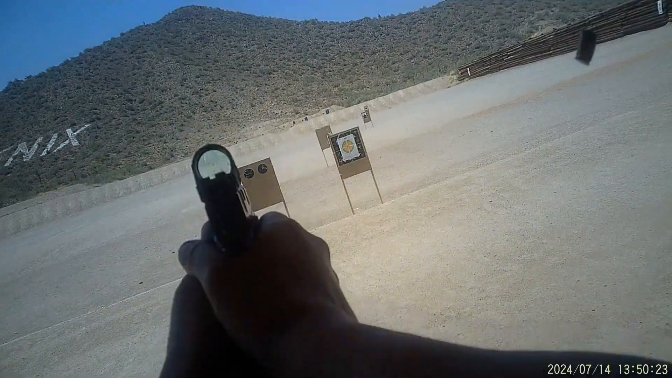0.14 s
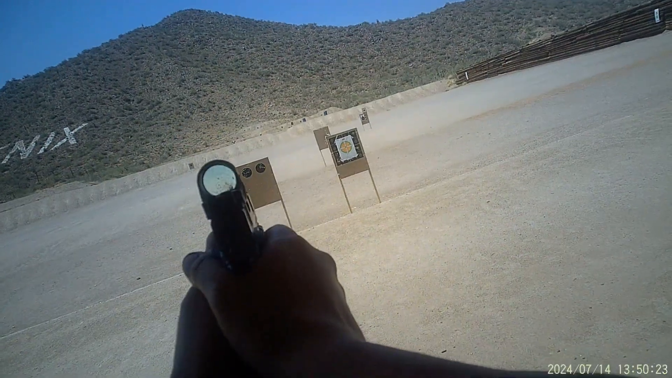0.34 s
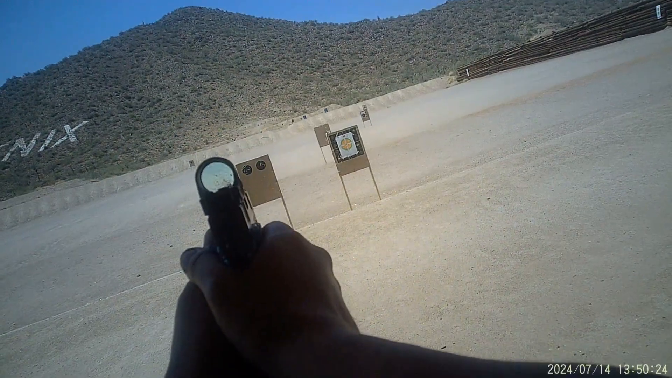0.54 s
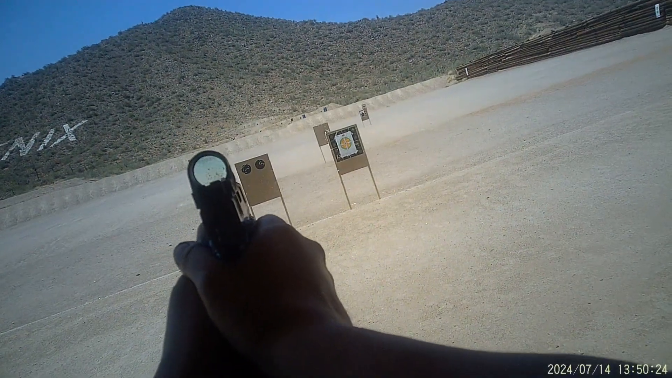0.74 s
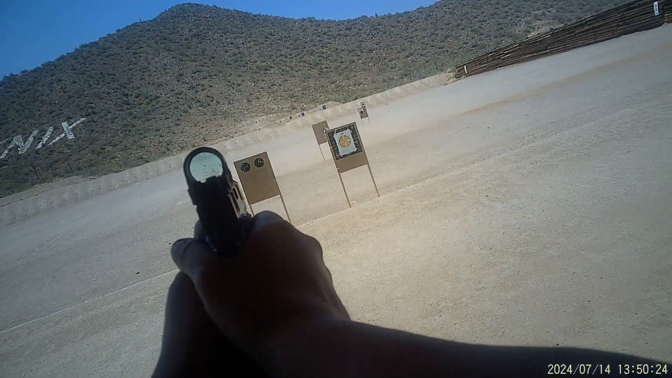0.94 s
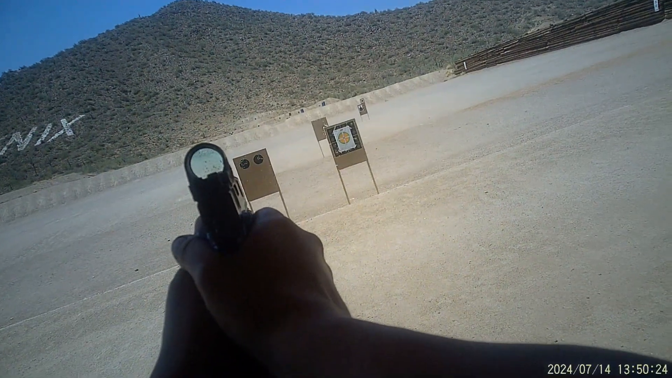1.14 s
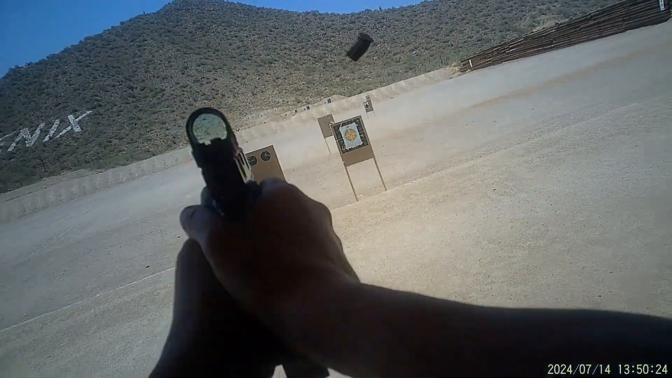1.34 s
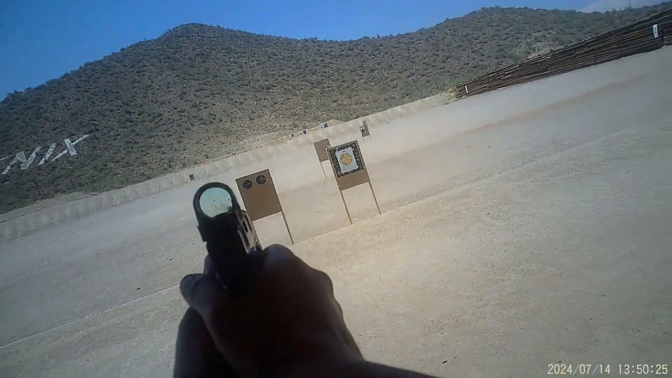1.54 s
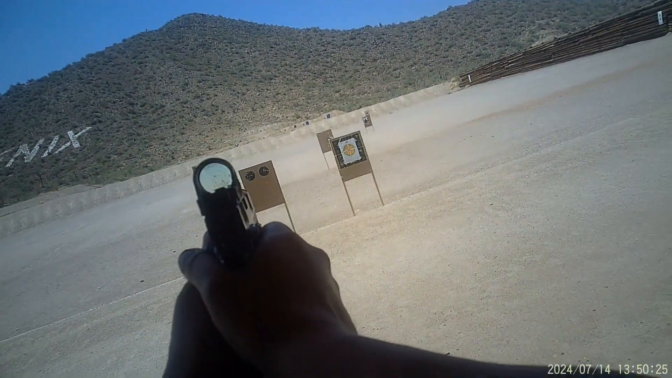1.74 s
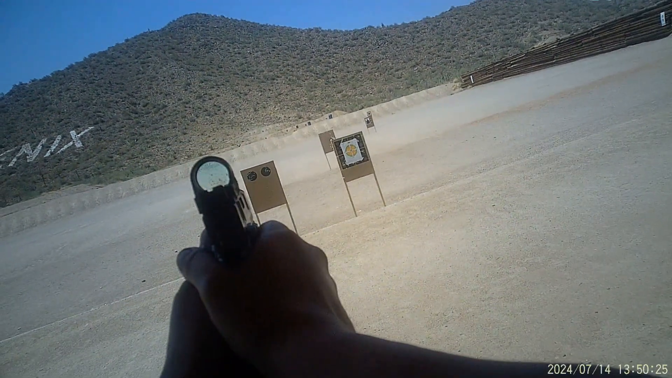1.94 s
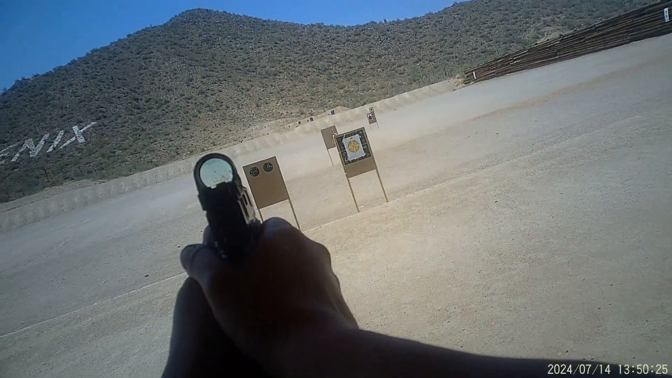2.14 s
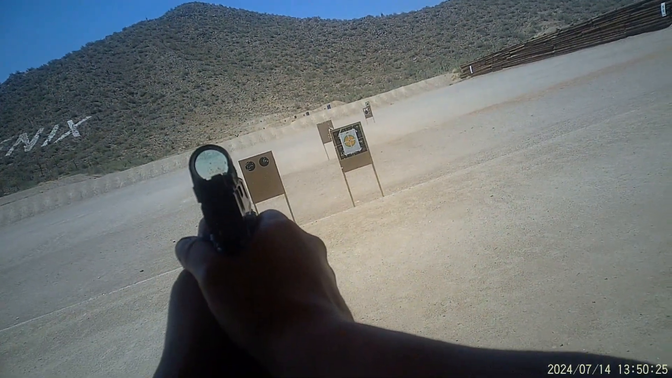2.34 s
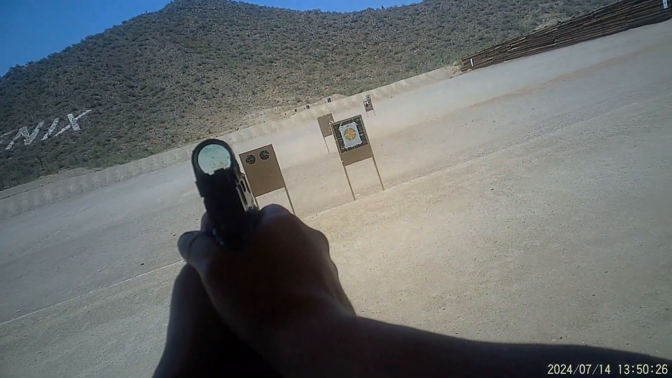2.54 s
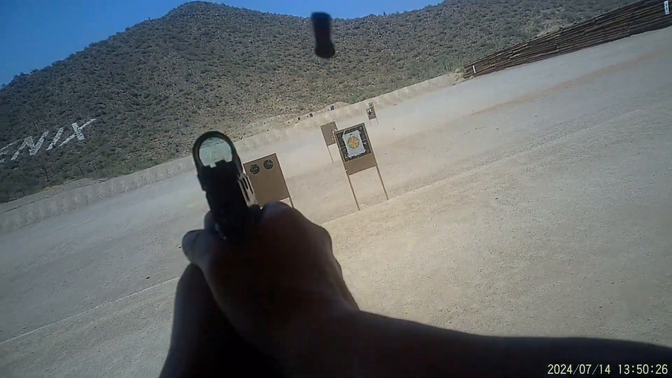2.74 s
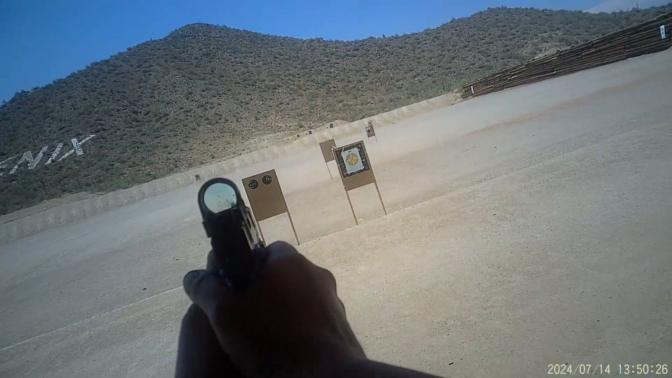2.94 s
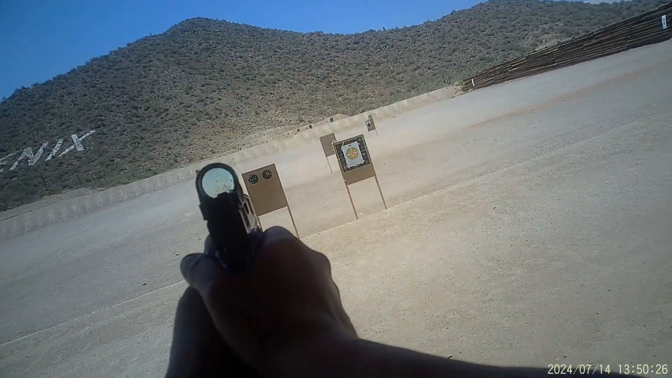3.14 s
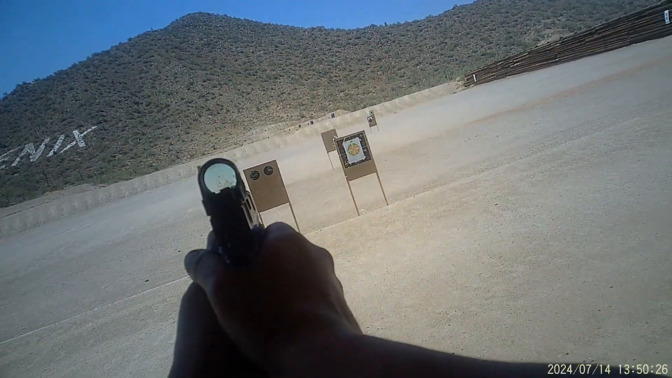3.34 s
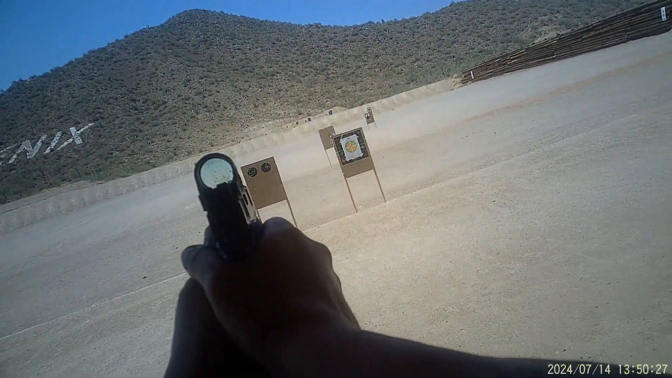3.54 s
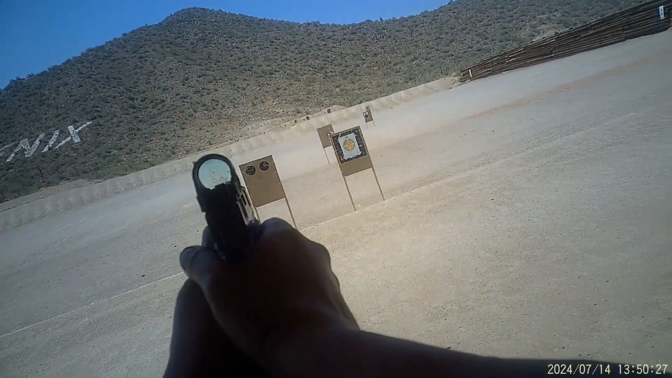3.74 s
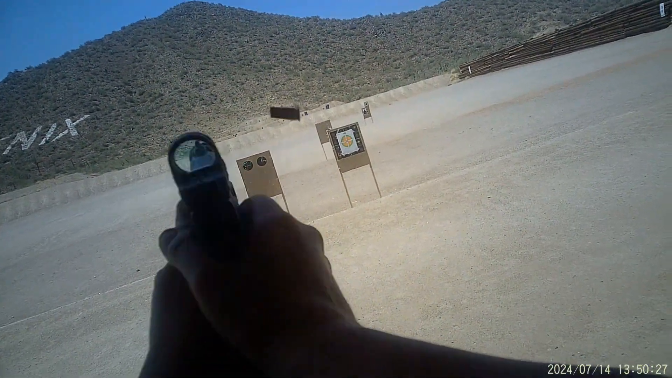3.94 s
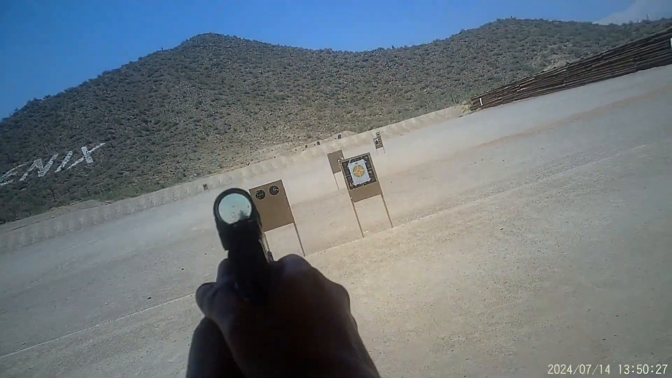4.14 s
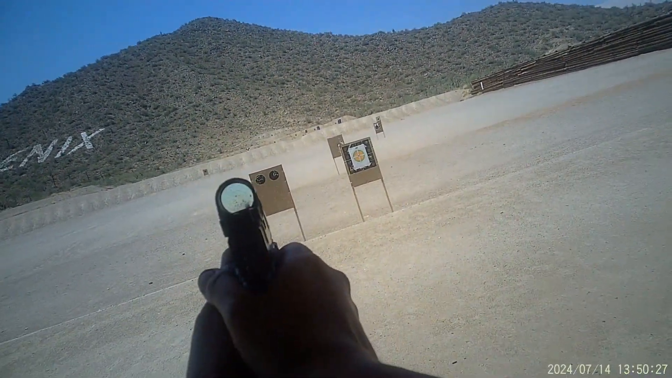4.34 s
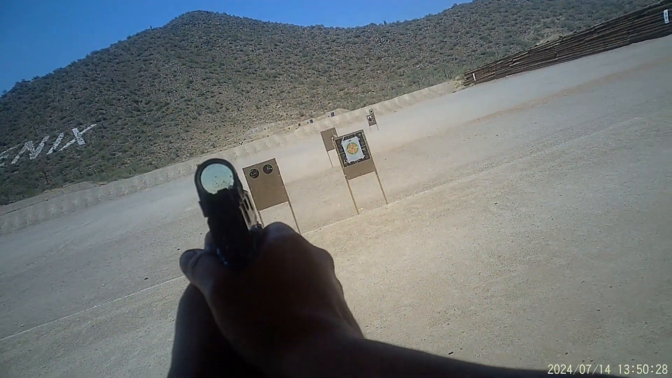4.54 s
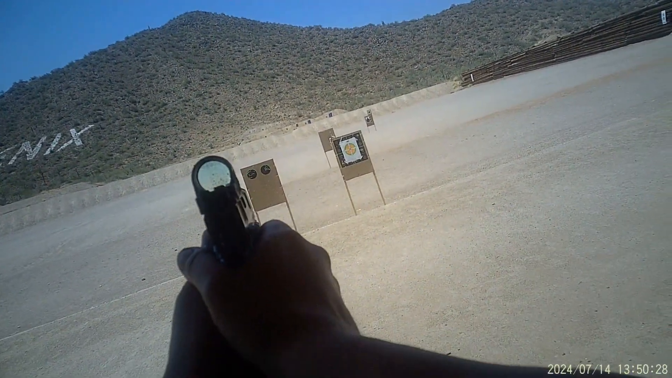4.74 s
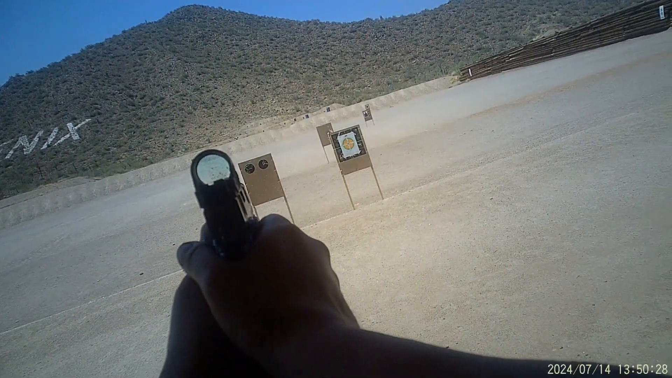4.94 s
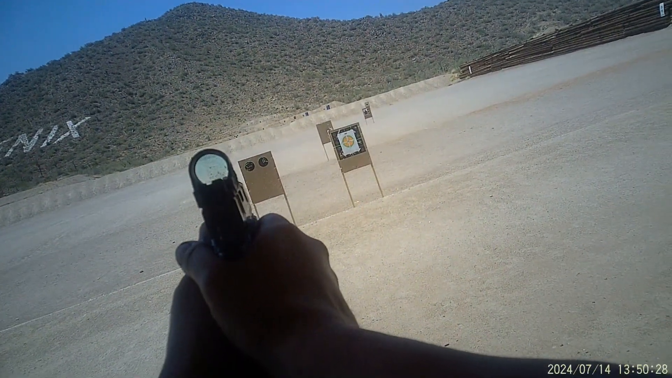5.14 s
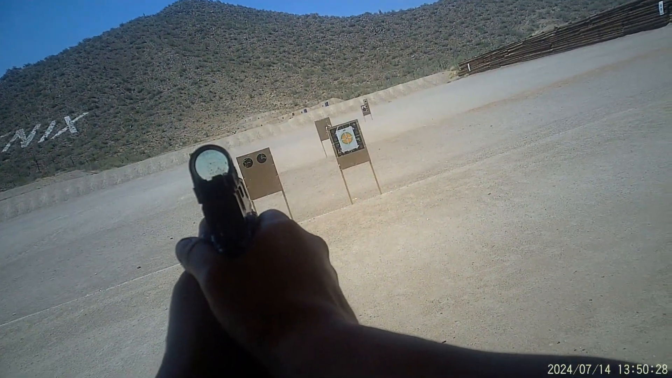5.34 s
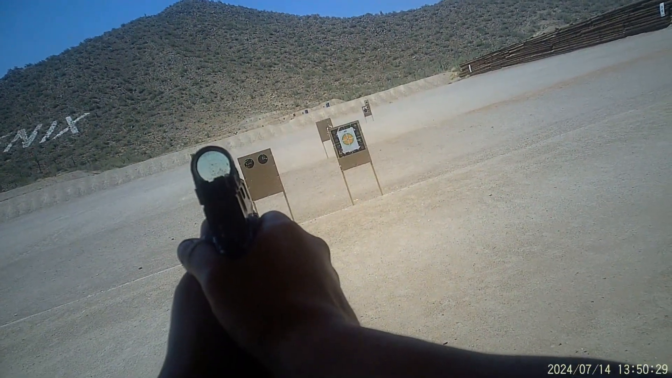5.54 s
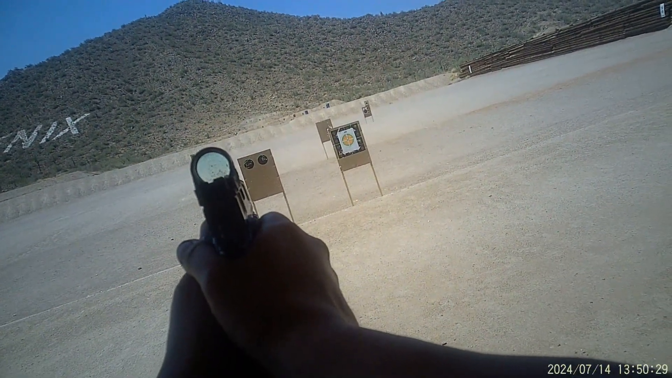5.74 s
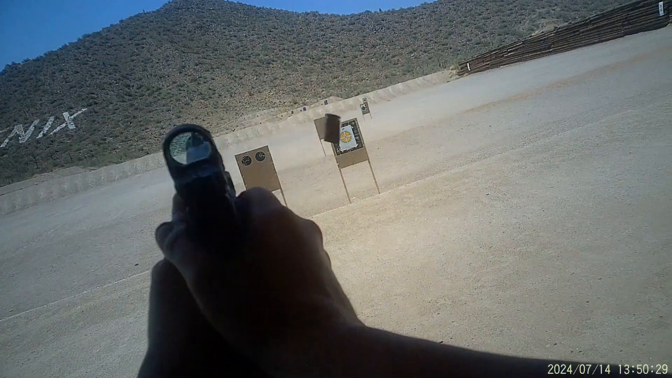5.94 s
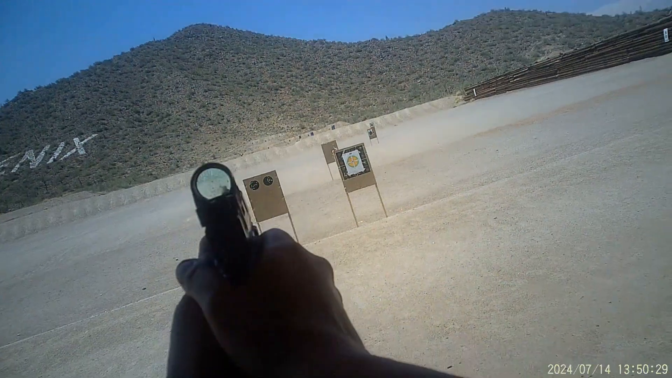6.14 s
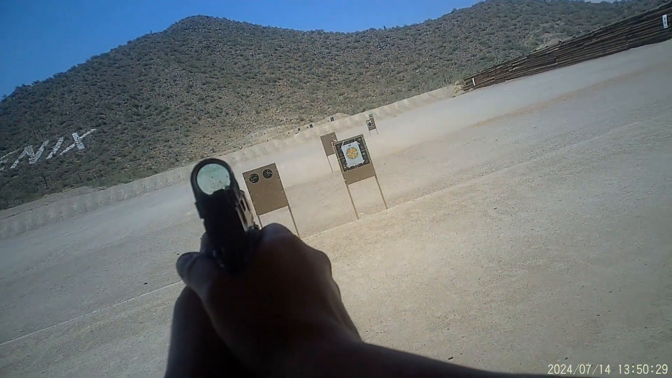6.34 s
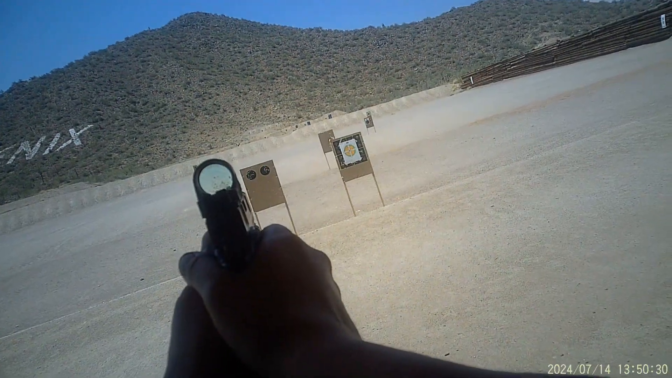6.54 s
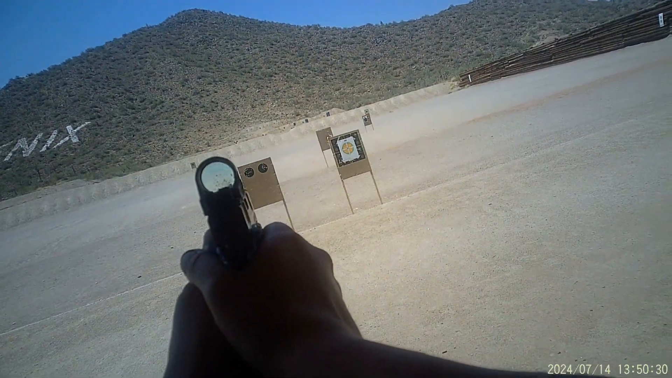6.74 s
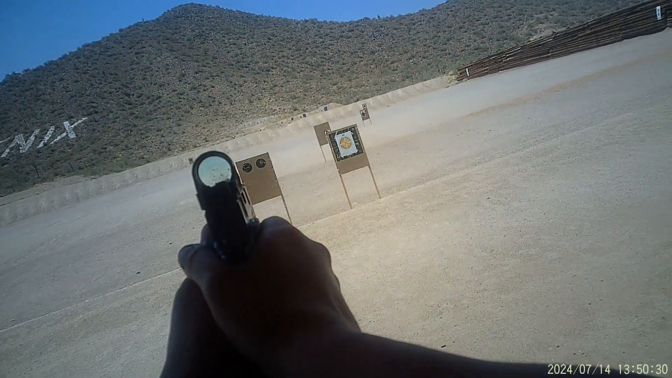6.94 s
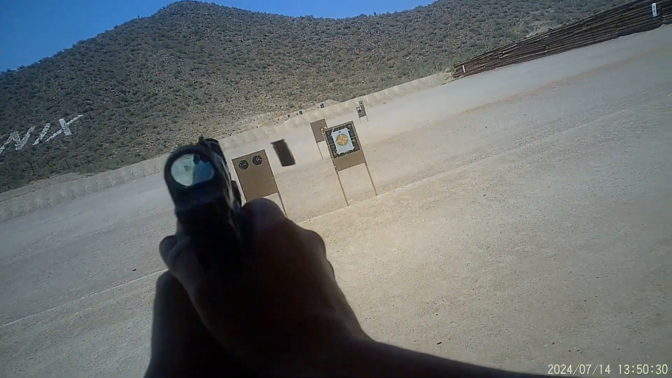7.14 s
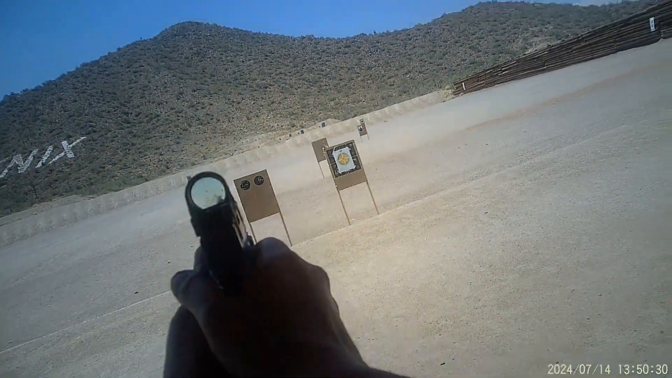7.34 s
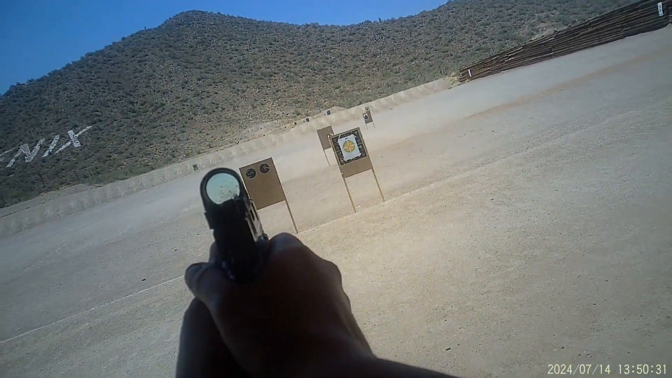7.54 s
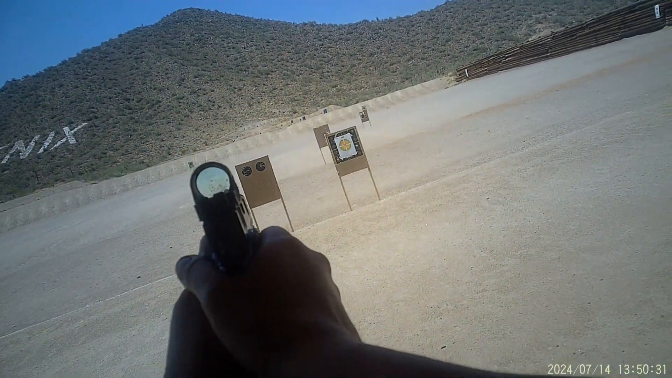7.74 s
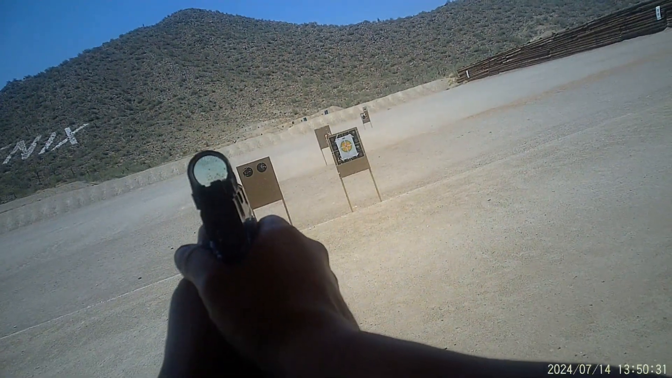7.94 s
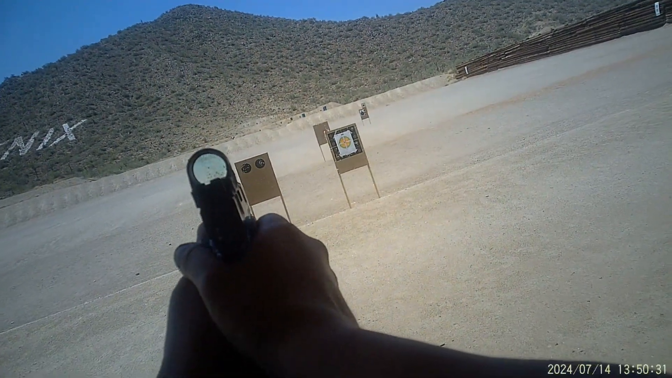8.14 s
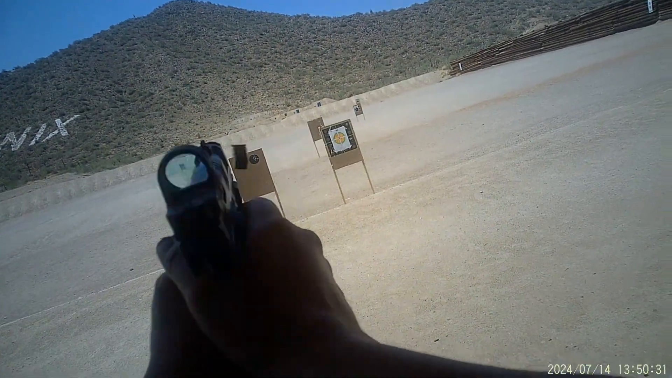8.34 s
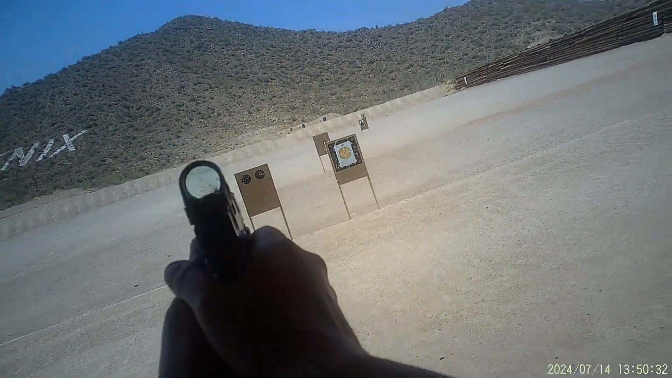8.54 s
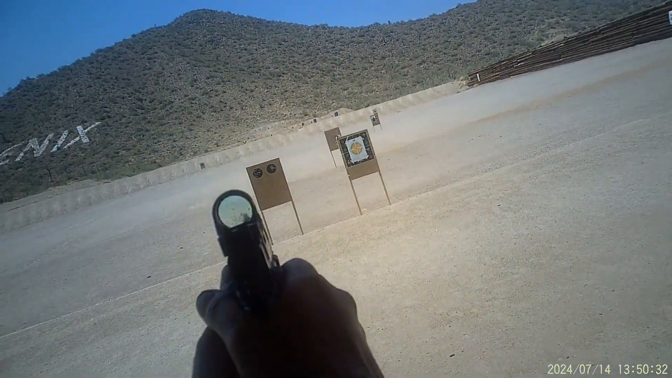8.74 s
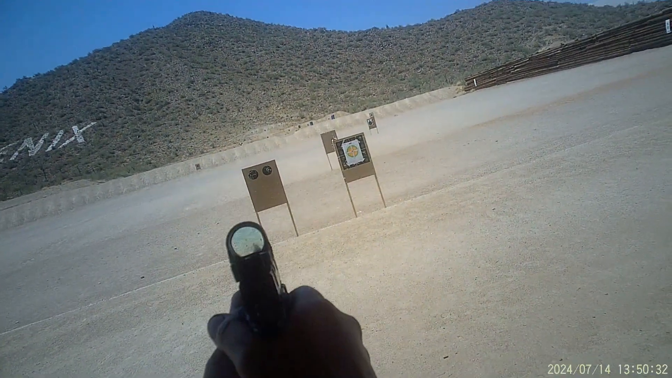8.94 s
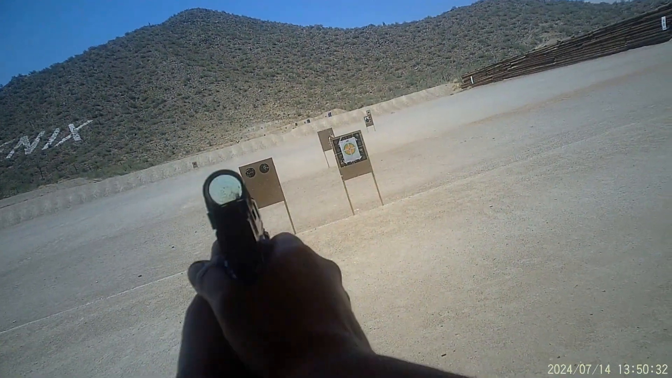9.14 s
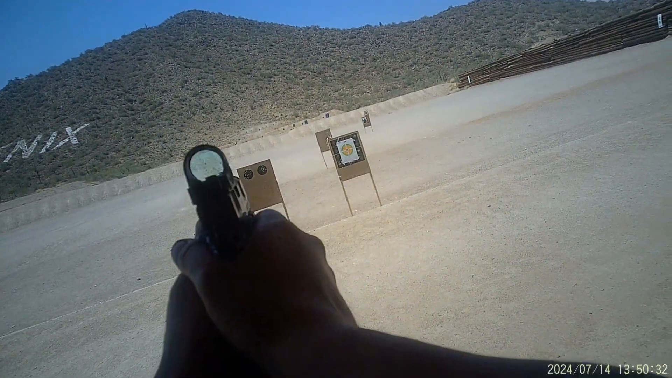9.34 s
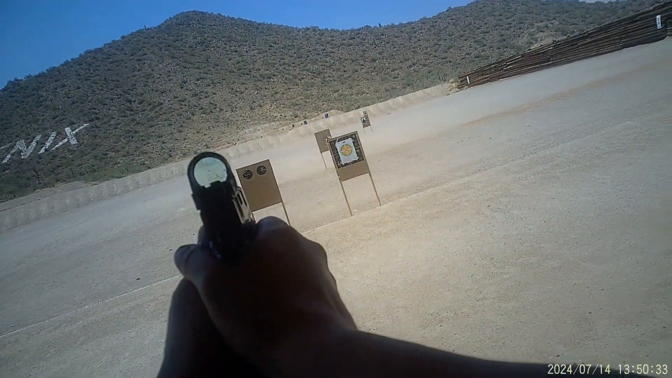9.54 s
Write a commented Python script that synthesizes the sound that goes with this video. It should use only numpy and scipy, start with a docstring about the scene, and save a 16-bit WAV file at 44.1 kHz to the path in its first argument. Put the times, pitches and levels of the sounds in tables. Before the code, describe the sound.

A pistol fires sharp overloaded blasts right at the microphone, echoes slapping back, while another shooter fires nearby and spent cases knock on a bench.

```python
"""An outdoor shooting range: a pistol is fired seven times right in front of the microphone, a second one
three times a few lanes away. An earlier shot is already rolling away at the start.
Blasts are decaying coloured noise with damped pulses for the slaps off firing line and backstop, and banded
noise for the hillside roll; they clip the input. Spent cases knock on the bench half a second later and one
rings on the concrete (decaying sines); rattles, the rush of air and the rumble of far hills are shaped noise."""
import sys
import numpy as np
from scipy import signal
from scipy.fft import rfft, irfft, next_fast_len
from scipy.io import wavfile

SR = 44100
rng = np.random.default_rng(int(sys.argv[2]) if len(sys.argv) > 2 else 0)


def int16_out(signal):
    """Quantize to a 16-bit WAV file."""
    q = np.round(np.clip(np.atleast_2d(signal).T, -1, 1) * 32767)
    wavfile.write(sys.argv[1], SR, q.astype(np.int16))


N = 427769
AGE = np.arange(int(1.5 * SR)) / SR   # seconds since the start of a sound
CUTOFF_HZ = 8700

# own pistol, the first row only heard rolling away:
# (time [s], blast [dB], hillside roll [dB], far rumble [dB])
OWN_SHOTS = [(-.43, -8, -2, 0), (0.0858, -0.5, 0, 2.5), (1.344, 1.5, 0, 4.5), (2.7228, -5.5, -1.5, 2),
             (4.0069, 0, -1, -9.5), (6.003, -5.5, -2.5, -1), (7.2246, -2, -1.5, -1),
             (8.4355, -2.5, 0, -1.5)]
# second pistol: (time [s], blast [dB], slaps [dB], hillside roll [dB],
# backstop echo delay [s], backstop echo level [dB], backstop echo pitch [Hz], far rumble [dB])
NEIGHBOUR_SHOTS = [(1.0646, 0, 0, 1.5, .2372, -6.5, 1190, -1.5),
                   (2.9381, -0.5, -4, -5, 0.26, -15, 796, 2.5),
                   (5.951, -0.5, -11.5, -4, .245, -30, 1010, 0)]
# colour of the bright muzzle crack: (frequency [Hz], density [dB per Hz])
CRACK_COLOUR = [(100, -25), (700, -14), (1300, -3), (2200, -9), (3100, 0), (4200, -2), (5200, -8.5),
                (8000, -16.5)]
# colour of the small rattles: (frequency [Hz], density [dB per Hz])
TICK_COLOUR = [(500, -20), (1500, -14.5), (2500, -7), (4000, 0.5), (5200, -8.5), (8000, -6.5)]


def own_pistol(shelter_db=-4, crack_db=31, boom_db=18, boom_t60=0.15, roll_db=-17):
    """A bright muzzle crack, then dense reflections of the firing line, slaps and the roll of the hillside."""
    # colour of the firing line's dense reflections: (frequency [Hz], density [dB per Hz])
    boom_colour = [(30, -30.5), (80, -20.5), (140, -6), (210, -13), (350, -7.5), (550, -1.5), (900, -3),
                   (1400, -3), (1900, -12.5), (2600, -18), (3700, -18), (5000, -22.5), (8000, -20)]
    # answering surfaces, the backstop last:
    # (time after the shot [s], pulse [dB], scatter [dB], crack [dB], rebound [dB])
    surfaces = [(.0615, 1, 0.5, -2, -2.5), (.123, -17.5, -14.5, -18.5, -7), (.185, -26, -24, -22, -3),
                (.2463, -9.5, -14, -31.5, -11.5)]
    out = np.zeros(N)
    firing_line = noise(boom_colour)
    slope = hillside(swell_s=0.33)
    for s, blast_db, hill_db, _ in OWN_SHOTS:
        crack = from_db(crack_db) * burst(CRACK_COLOUR, .002)
        reflections = mostly(firing_line, noise(boom_colour)) * dying(boom_t60)
        boom = from_db(boom_db) * reflections * lumps(depth_db=3, per_s=260)
        blast = crack + boom + from_db(shelter_db) * shelter() + slaps(surfaces, hz=1320)
        roll = mostly(slope, hillside(swell_s=0.34)) * lumps(depth_db=2.5, per_s=200)
        add(out, s, from_db(blast_db) * blast + from_db(roll_db + hill_db) * roll)
    return out


def second_pistol(shelter_db=-12, front_db=6, boom_db=0, boom_t60=0.11, roll_db=-18):
    """From a few lanes away the blast is rounder, with a softer front and its own slaps and backstop echo."""
    # colour of the distant blast: (frequency [Hz], density [dB per Hz])
    blast_colour = [(30, -13), (80, -10), (180, 3), (330, -0.5), (570, 1.5), (780, -4), (1120, 3.5),
                    (1450, -3.5), (2100, -6), (3800, -14.5), (5200, -22), (8000, -29.5)]
    # answering surfaces: (time after the shot [s], pulse [dB], scatter [dB], crack [dB], rebound [dB])
    surfaces = [(.0455, 3.5, -4, -12, -18), (.112, -21, -30, -17, 2.5), (.2025, -10.5, -24, -12.5, -22.5)]
    out = np.zeros(N)
    for s, blast_db, slaps_db, hill_db, backstop_s, backstop_db, backstop_hz, _ in NEIGHBOUR_SHOTS:
        front = from_db(front_db) * burst(blast_colour, 0.0052)
        boom = from_db(boom_db) * noise(blast_colour) * dying(boom_t60) * lumps(depth_db=1.0, per_s=200)
        blast = front + boom + from_db(shelter_db) * shelter()
        echoes = slaps(surfaces, hz=1030)
        roll = hillside(swell_s=0.36) * lumps(depth_db=4.0, per_s=130)
        add(out, s, from_db(blast_db) * blast)
        add(out, s, from_db(slaps_db) * echoes + from_db(roll_db + hill_db) * roll)
        add(out, s + backstop_s, from_db(backstop_db) * pulse(backstop_hz))
    return out


def slaps(rows, hz, scatter_s=0.0036, rebound_s=.0295):
    """Echoes of pulse, scatter and leftover crack; each comes once more off a wall behind the firing line."""
    # colour of the scatter: (frequency [Hz], density [dB per Hz])
    scatter_colour = [(60, -28.5), (200, -17.5), (600, -8), (950, 7.5), (1350, -3.5), (1900, -20.5),
                      (4000, -26), (8000, -37)]
    out = np.zeros(len(AGE))
    for delay, pulse_db, scatter_db, crack_db, rebound_db in rows:
        for lag, db in ((0, 0), (rebound_s, rebound_db)):
            echo = from_db(pulse_db) * pulse(hz)
            echo += from_db(scatter_db) * burst(scatter_colour, scatter_s)
            echo += from_db(crack_db) * burst(CRACK_COLOUR, 0.0005)
            add(out, delay + lag, from_db(db) * echo)
    return out


def pulse(hz, rise=.0008):
    """The blast wave off a flat surface, as the microphone port rings with it: a few cycles, height 1."""
    swell = AGE / rise * np.exp(1 - AGE / rise)
    return swell ** 2 * np.cos(2 * np.pi * hz * (AGE - rise))


def shelter():
    """Reflections between roof, benches and floor of the covered firing line, outlasting the boom."""
    # colour of the covered space: (frequency [Hz], density [dB per Hz])
    shelter_colour = [(60, -23), (120, -2), (280, 0), (500, -4.5), (850, -1), (1400, -5), (2200, -13.5),
                      (3800, -9), (5500, -9), (8000, -13.5)]
    return noise(shelter_colour) * dying(t60=.3) * lumps(depth_db=4, per_s=220)


def hillside(swell_s):
    """Scatter from ground and slope dies at its own pace in each band, and swells once the slope answers."""
    # colour of the roll: (frequency [Hz], density [dB per Hz])
    roll_colour = [(30, -38), (70, -31), (105, -4.5), (170, -8), (260, -5), (400, -5), (550, -2), (1100, 3),
                   (1450, -1), (2000, -11), (2700, -13), (3700, -13.5), (5000, -22.5), (8000, -28)]
    # dying of the roll: (band centre [Hz], time to fall 60 dB [s])
    roll_decay = [(100, 0.91), (500, 1.214), (1200, 0.9), (3000, 0.89), (7000, 1.1)]
    spectrum = rfft(noise(roll_colour))
    hz = np.fft.rfftfreq(len(AGE), 1 / SR)
    centres = [f for f, t60 in roll_decay]
    out = 0
    for k, (f, t60) in enumerate(roll_decay):
        # overlapping bands that add up to the whole spectrum
        share = at_hz(list(zip(centres, np.eye(len(centres))[k])), hz)
        out = out + irfft(spectrum * share, len(AGE)) * dying(t60)
    answer = (1 + np.tanh((AGE - swell_s) / .02)) / 2
    return out * (1 + from_db(-7) * answer)


def mostly(same, fresh):
    """The shooter stands still, so reflections largely repeat from shot to shot."""
    return np.sqrt(2 / 3) * same + np.sqrt(1 / 3) * fresh


def lumps(depth_db, per_s):
    """Reflections arrive in clumps: a quick random gain of mean power 1."""
    knots = rng.standard_normal(SR // 10)
    gain = from_db(depth_db * np.interp(AGE * per_s, np.arange(len(knots)), knots))
    return gain / np.sqrt(np.mean(gain ** 2))


def cases(scatter_db=-25):
    """Spent brass knocks on the bench, or bounces and rings on the concrete: short puffs plus ringing modes."""
    # cases landing on the bench: (time [s], knock [dB], click [dB], ring [dB])
    landings = [(0.606, -26, -13, -28.5), (1.8929, -49, -23.5, -43), (2.271, -41.5, -55, -34),
                (3.2766, -27.5, -38, -54), (4.567, -29, -23, -30.5), (6.4793, -16.5, -40, -40),
                (7.763, -33.5, -44, -39)]
    # bench modes: (frequency [Hz], level before tilt and scatter [dB], time to fall 60 dB [s])
    bench_modes = [(1070, -1, .15), (1470, -10, .14), (1670, -13, .12), (2335, -16, .22), (2372, -16, .18),
                   (3600, -16, .11), (3810, -18, .12), (4290, -21, .12)]
    # colours of knock and click: (frequency [Hz], density [dB per Hz])
    knock_colour = [(60, -9), (200, 6), (600, 19), (1100, 19.5), (1800, 14), (2700, 16), (4000, -38),
                    (8000, -36)]
    click_colour = [(200, -20), (1050, 18.5), (1500, -2), (2100, 6), (2500, 18), (2950, -1.5), (3700, 27),
                    (4400, 0), (5200, -28), (8000, -25)]
    # a case bouncing on concrete: (time [s], contact [dB], ring [dB])
    bounces = [(2.0587, -37.5, -55), (2.0879, -37.5, -50.5), (2.103, -40, -66), (2.13, -46, -47)]
    # colour of brass touching concrete: (frequency [Hz], density [dB per Hz])
    contact_colour = [(300, -28), (1100, -0.5), (1500, 0), (2100, -9), (3200, -9), (4500, -22), (8000, -17)]
    # thin brass case, slightly out of round so that close modes beat:
    # (frequency [Hz], level before scatter [dB], time to fall 60 dB [s])
    brass_modes = [(3019, -1, .7), (3022, -1, .7), (3865, -5, .45), (4317, -5, .45), (4893, -6, .36),
                   (6223, -6, .4), (6923, -12, .3)]
    knock_s, click_s, rattle_s, contact_s = 0.0034, 0.0036, 0.076, 0.0088   # times to fall by 1/e
    out = np.zeros(N)
    for s, knock_db, click_db, ring_db in landings:
        # the sharper the click, the brighter the ring [dB per octave]
        tilt_db = 2.5 + .18 * (click_db - ring_db)
        knock = burst(knock_colour, knock_s)
        click = burst(click_colour, click_s) + from_db(scatter_db) * burst(TICK_COLOUR, rattle_s)
        add(out, s, from_db(knock_db) * knock + from_db(click_db) * click)
        add(out, s, from_db(ring_db) * ring(bench_modes, tilt_db))
    for s, contact_db, ring_db in bounces:
        add(out, s, from_db(contact_db) * burst(contact_colour, contact_s))
        add(out, s, from_db(ring_db) * ring(brass_modes))
    return out


def ring(modes, tilt_db=0):
    """One blow sets every mode ringing, in alternating sign and at a slightly random level, tilted per octave."""
    out = 0
    for k, (hz, db, t60) in enumerate(modes):
        octaves = np.log2(hz / modes[0][0])
        level = from_db(db + tilt_db * octaves + 2 * rng.standard_normal())
        out = out + (-1) ** k * level * np.sin(2 * np.pi * hz * AGE) * dying(t60)
    return out


def ticks(faint_per_s=0.74, faint_db=-59):
    """Bright little rattles as puffs of noise: a few clear ones, and faint ones scattered at random."""
    # the clearer rattles of trigger, grip and far cases: (time [s], level [dB])
    clear_ticks = [(0.916, -46.5), (3.333, -38), (3.782, -48.5), (5.055, -61), (5.328, -58), (6.878, -54),
                   (7.013, -50), (8.333, -52), (9.223, -44)]
    out = np.zeros(N)
    for s, db in clear_ticks:
        add(out, s, from_db(db) * burst(TICK_COLOUR, 0.013))
    # one faint tick at a random place in each time slot
    for slot, (place, size) in enumerate(rng.random((40, 2))):
        s = min((slot + place) / faint_per_s, N / SR)
        add(out, s, from_db(faint_db) * (.5 + size) * burst(TICK_COLOUR, .009))
    return out


def air(air_db=-62.5, rumble_db=-46.5, rise_s=.2, rumble_t60=4.0):
    """Dull rush of the open range, and the long rumble that every shot raises in the distant hills."""
    # colour of rush and rumble: (frequency [Hz], density [dB per Hz])
    air_colour = [(20, -5), (40, -4.5), (100, -7), (180, -4.5), (400, -3), (750, -1.5), (1000, -6.5),
                  (1400, -8.5), (2000, -17), (4000, -22), (8000, -25.5)]
    power = from_db(air_db) ** 2
    for s, *_, far_db in OWN_SHOTS + NEIGHBOUR_SHOTS:
        age = np.maximum(np.arange(N) / SR - s, 0)
        rumble = (1 - np.exp(-age / rise_s)) * np.exp(-np.log(1000) * age / rumble_t60)
        power = power + (from_db(rumble_db + far_db) * rumble) ** 2
    return np.sqrt(power) * noise(air_colour, size=N)


def from_db(db):
    """Decibels to gain."""
    return 10 ** (np.asarray(db) / 20)


def at_hz(points, hz):
    """Read a table on a log-frequency axis."""
    f, value = np.transpose(points)
    return np.interp(np.log(np.maximum(hz, 1)), np.log(f), value)


def noise(spectrum, size=len(AGE)):
    """Coloured noise of rms 1."""
    padded = next_fast_len(size)
    hz = np.fft.rfftfreq(padded, 1 / SR)
    white = rfft(rng.standard_normal(padded))
    x = irfft(white * from_db(at_hz(spectrum, hz)), padded)[:size]
    return x / x.std()


def burst(spectrum, length):
    """A sudden puff of noise that falls by 1/e in `length` seconds; its energy is steady from puff to puff."""
    fade = np.exp(-AGE[:SR // 5] / length)
    x = noise(spectrum, size=len(fade)) * fade
    x = x * np.sqrt(np.sum(fade ** 2) / np.sum(x ** 2))
    return np.pad(x, (0, len(AGE) - len(x)))


def dying(t60):
    """Exponential decay by 60 dB in t60 seconds."""
    return np.exp(-np.log(1000) * AGE / t60)


def add(out, s, sound):
    """Mix a sound in at time s, keeping only what falls inside."""
    at = int(round(s * SR))
    first, last = max(at, 0), min(at + len(sound), len(out))
    out[first:last] += sound[first - at:last - at]


def overload(x, top, lift_db, lift_s):
    """The input stage clips flat, and its ceiling rises by up to lift_db while it is overdriven."""
    fine = signal.resample_poly(x, 2, 1, axis=-1)   # clip at twice the rate against aliasing
    keep = np.exp(-1 / (2 * SR * lift_s))
    strain = signal.lfilter([1 - keep], [1, -keep], (np.abs(fine) > top) + 1e-18)
    ceiling = top * from_db(lift_db * strain)
    return signal.resample_poly(np.clip(fine, -ceiling, ceiling), 1, 2, axis=-1)


def scene():
    """Everything meets at one microphone."""
    return (own_pistol() + second_pistol() + cases() + ticks() + air())[None]


def record(dry, hiss_db=-71):
    """The blasts overload the input; the recorder dulls the treble, adds its hiss and cuts the top."""
    # recorder's colour after the overload: (frequency [Hz], gain [dB])
    recorder_colour = [(100, 2), (1500, 0), (2200, -2.5), (3300, 0.5), (4300, 0.5), (4900, -11.5),
                       (6500, -8), (7600, -16), (8500, -28)]
    heard = signal.sosfilt(signal.butter(4, CUTOFF_HZ, fs=SR, output="sos"), dry)
    flat = overload(heard, top=0.54, lift_db=1.5, lift_s=0.034)
    hz = np.linspace(0, SR / 2, 513)
    colour = signal.firwin2(129, hz, from_db(at_hz(recorder_colour, hz)), fs=SR)
    coloured = signal.fftconvolve(flat, colour[None], mode="same", axes=-1)
    white = from_db(hiss_db) * rng.standard_normal(N)
    hiss = signal.sosfilt(signal.butter(6, 7400, fs=SR, output="sos"), white)
    top_cut = signal.ellip(10, .2, 70, CUTOFF_HZ, fs=SR, output="sos")
    return signal.sosfilt(top_cut, coloured + hiss)


dry = scene()
out = record(dry)
int16_out(out)
```